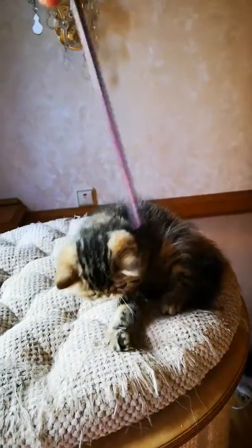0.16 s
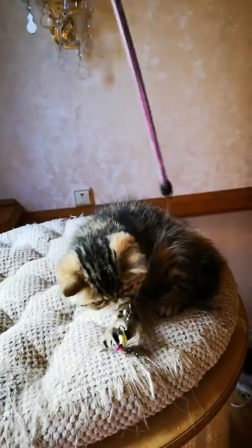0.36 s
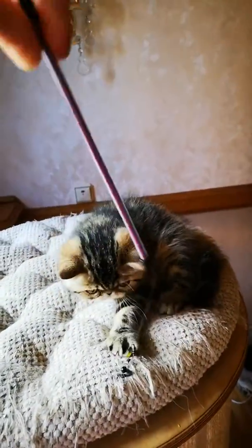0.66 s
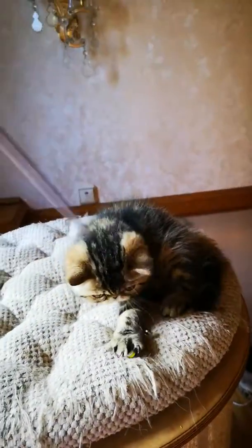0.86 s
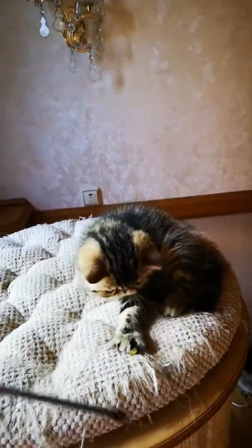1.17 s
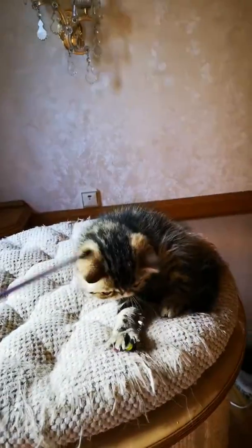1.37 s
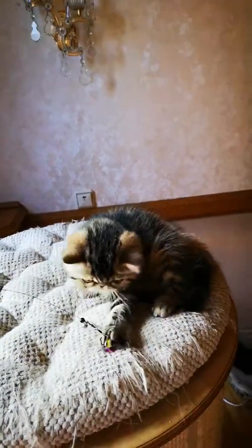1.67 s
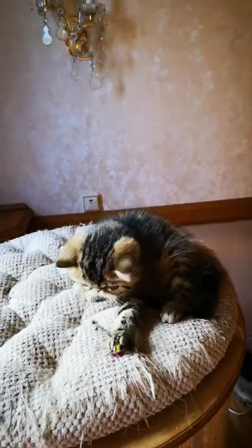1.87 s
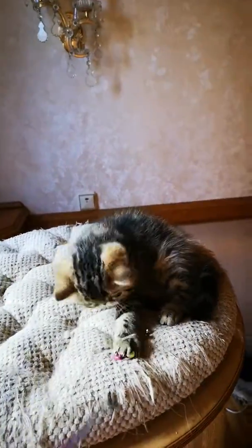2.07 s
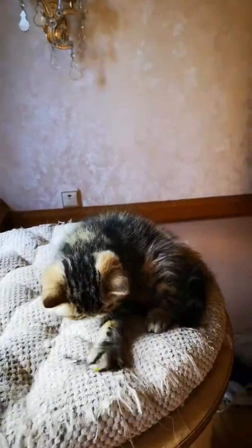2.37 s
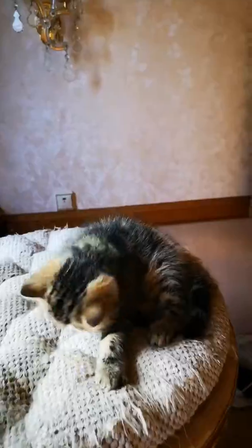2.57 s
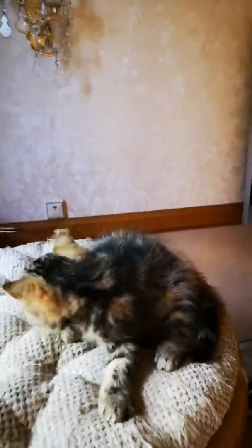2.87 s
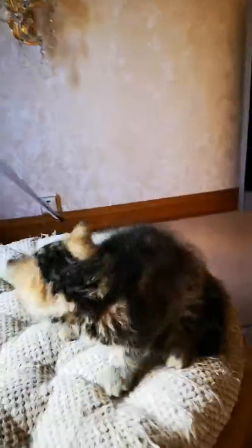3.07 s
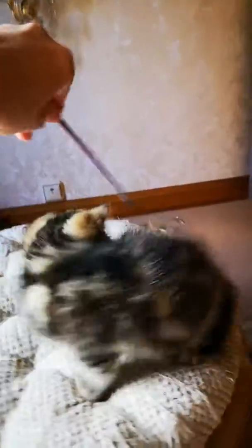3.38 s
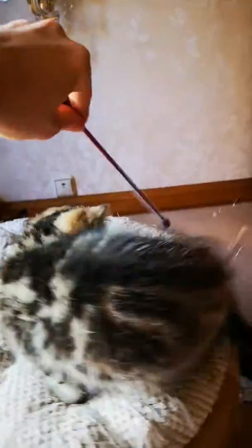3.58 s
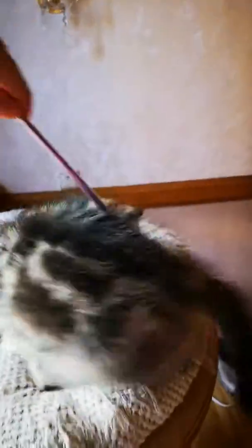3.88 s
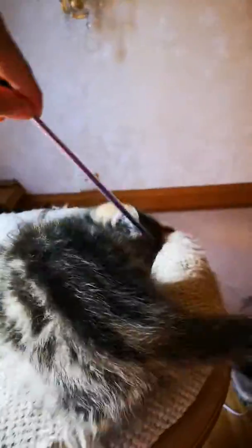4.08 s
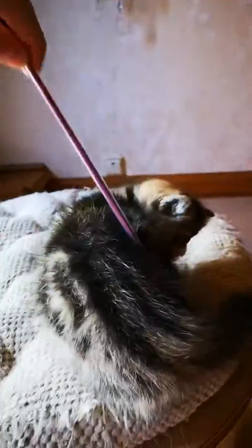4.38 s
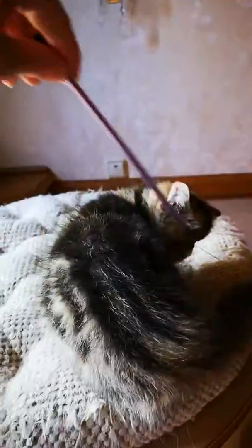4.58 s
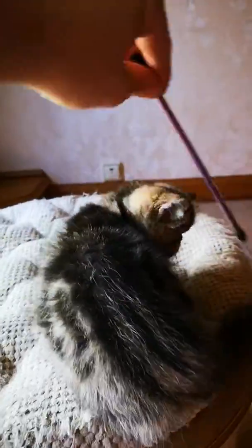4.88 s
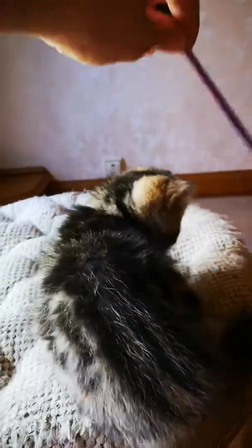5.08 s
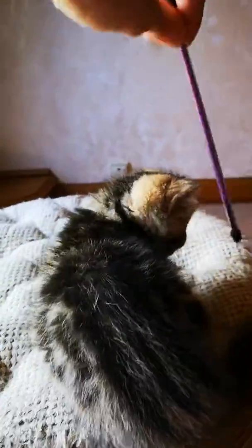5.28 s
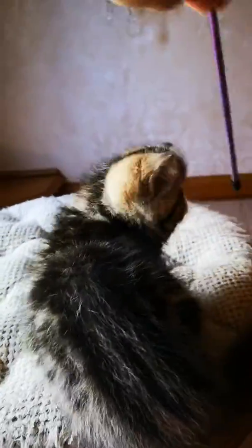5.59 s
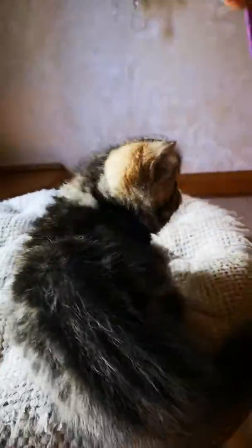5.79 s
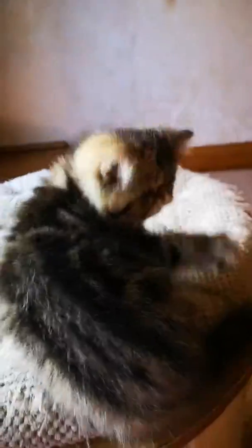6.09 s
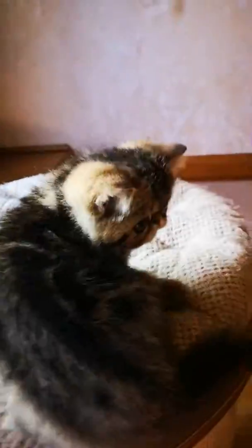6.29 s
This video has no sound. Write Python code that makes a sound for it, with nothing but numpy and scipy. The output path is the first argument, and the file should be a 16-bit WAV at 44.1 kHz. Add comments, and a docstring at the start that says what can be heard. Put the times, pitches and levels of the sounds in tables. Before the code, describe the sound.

A kitten plays with a wand toy on a knitted cushion in a small room. The toy's tiny bell tinkles and rattles in very high, uneven bursts, with light wool rubbing, soft paw pats and brief claw scratches. After a short lull the play resumes, and hard woody ticks join in, growing sharper late on. A low rumble and faint whine lie underneath, and the close hand-held microphone is jostled near the end.

```python
"""A kitten paws at a wand toy on a knitted cushion, over a small room's low rumble and faint whine.
From the start the toy's pellet bell tinkles and rattles as it rubs over the wool; paws pat, claws
scratch, a soft hum comes and goes. After a lull the play resumes at about 2 s. From 3 s something
hard and light ticks, sharply from 5 s. Near the end the hand-held microphone is jostled hardest."""
import sys
import numpy as np
from scipy import signal
from scipy.fft import rfft, irfft
from scipy.io import wavfile
from scipy.ndimage import uniform_filter1d

SR = 44100
rng = np.random.default_rng(int(sys.argv[2]) if len(sys.argv) > 2 else 0)


def pcm_store(signal):
    """Save signal as 16-bit PCM."""
    levels = np.round(np.clip(np.atleast_2d(signal), -1, 1) * 32767)
    wavfile.write(sys.argv[1], SR, levels.astype(np.int16).T)


N = 284004
TIME = np.arange(N) / SR


def from_db(db):
    """Decibels to gain."""
    return 10 ** (np.asarray(db) / 20)


def unit_rms(x):
    """Scale to unit power."""
    return x / np.sqrt(np.mean(x ** 2) + 1e-20)


def at_hz(points, hz):
    """Interpolate a table on a log-frequency axis."""
    freq_hz, value = np.transpose(points)
    return np.interp(np.log(np.maximum(hz, 1)), np.log(freq_hz), value)


def colour(x, spectrum):
    """Apply a spectrum; 12 dB per octave roll-off past its ends."""
    size = x.shape[-1]
    hz = np.arange(size // 2 + 1) * SR / size
    below = np.minimum(hz / spectrum[0][0], 1) ** 2
    above = np.minimum(spectrum[-1][0] / np.maximum(hz, 1), 1) ** 2
    return irfft(rfft(x) * from_db(at_hz(spectrum, hz)) * below * above, size)


def impulse(spectrum, size=1024):
    """Minimum-phase pulse with this spectrum, peak 1."""
    hz = np.arange(size // 2 + 1) * SR / size
    cepstrum = irfft(np.log(from_db(at_hz(spectrum, hz))))
    cepstrum[1:size // 2] *= 2
    cepstrum[size // 2 + 1:] = 0
    pulse = irfft(np.exp(rfft(cepstrum)))
    return pulse / np.abs(pulse).max()


def butterworth(x, order, edge_hz, kind):
    """Causal Butterworth filter."""
    return signal.sosfilt(signal.butter(order, edge_hz, kind, fs=SR, output="sos"), x)


def drift(rate_hz):
    """Slow random curve, unit RMS."""
    knots = rng.standard_normal(int(N / SR * rate_hz) + 2)
    return unit_rms(np.interp(TIME * rate_hz, np.arange(len(knots)), knots))


def grains(per_s, spread_db):
    """Random clicks of uneven size."""
    sizes = from_db(spread_db * np.minimum(rng.exponential(1, N), 4))
    return (rng.random(N) < per_s / SR) * sizes * rng.choice([-1, 1], N)


def swells(rows, rest_db):
    """Gaussian gain swells over a resting level; widths at half height."""
    bumps = (from_db(db) * .5 ** ((2 * (TIME - centre_s) / width_s) ** 2)
             for centre_s, width_s, db in rows)
    return np.sqrt(from_db(rest_db) ** 2 + sum(bump ** 2 for bump in bumps))


def panned(balance_db):
    """Stereo gains of mean power 1; balance is left minus right."""
    gains = from_db(np.array([[.5], [-.5]]) * balance_db)
    return gains / np.sqrt(np.mean(gains ** 2, axis=0))


def from_the_right(x, lag_s=.00013):
    """Direct sound reaches the left channel later."""
    return np.array([np.roll(x[0], round(lag_s * SR)), x[1]])


def add(out, start_s, sound):
    """Mix a sound in at start_s."""
    i = max(round(start_s * SR), 0)
    out[..., i:i + sound.shape[-1]] += sound[..., :max(N - i, 0)]


# left-right likeness of the room field: freq_hz, correlation
COHERENCE = [(30, 0.99), (130, 1), (300, 0.79), (600, 0), (1500, 0.4), (4000, 0), (15000, 0)]
def diffuse_noise(spectrum):
    """Stereo noise, alike in the bass, unrelated in the treble."""
    correlation = at_hz(COHERENCE, np.arange(N // 2 + 1) * SR / N)
    mid, side = rfft(rng.standard_normal((2, N)))
    stereo = np.sqrt(1 + correlation) * mid + np.sqrt(1 - correlation) * side * [[1], [-1]]
    return unit_rms(colour(irfft(stereo, N), spectrum))


# room decay: freq_hz, t60_s
ROOM_DECAY = [(200, 1), (1700, 0.54), (3000, 0.31), (5000, 0.33), (10000, 0.35), (15000, 0.028)]
def room(x, early_db, tail_db, early_s, wall_hz):
    """Echoes off near surfaces plus a tail that dies first in the treble; furnishings dull both."""
    t = TIME[:SR // 2]
    early = rng.standard_normal((2, len(t))) ** 5 * np.exp(-t / early_s) * (t > .001)
    early /= np.sqrt(np.sum(early ** 2, axis=1, keepdims=True))
    tail, edges_hz = 0, np.geomspace(150, 17000, 10)
    for low, high in zip(edges_hz, edges_hz[1:]):
        band = butterworth(rng.standard_normal((2, len(t))), 2, [low, high], "band")
        t60_s = at_hz(ROOM_DECAY, np.sqrt(low * high))
        tail = tail + band * np.exp(-np.log(1000) * t / t60_s)
    tail *= np.minimum(t / 0.0016, 1)
    tail /= np.sqrt(np.sum(tail ** 2) / 2)
    response = butterworth(from_db(early_db) * early + from_db(tail_db) * tail, 1, wall_hz, "low")
    return signal.fftconvolve(x[None], response, axes=1)[:, :len(x)]


# room noise: freq_hz, density_db
AIR_SPECTRUM = [(22, 5), (32, 2), (45, -15), (100, -13.5), (175, -8), (250, -17), (330, -21), (480, -26.5),
                (650, -28.5), (1020, -25), (1400, -28.5), (2160, -26), (3000, -31), (4400, -34),
                (5800, -29.5), (8700, -33), (11100, -38), (15000, -53)]
# drone fade: time_s, level_db
DRONE_FADE = [(0, -60), (3.3, -60), (6.44, -78)]
def room_rumble(air_db, drone_hz):
    """Steady room air and a deep narrow-band drone that fades."""
    air = from_db(air_db) * diffuse_noise(AIR_SPECTRUM)
    drone_db = np.interp(TIME, *np.transpose(DRONE_FADE))
    drone = diffuse_noise([(drone_hz * 0.89, -18), (drone_hz, 0), (drone_hz * 1.2, -18)])
    return air + from_db(drone_db) * drone


# hum swells: centre_s, width_s, level_db
HUM_RISES = [(.52, 0.43, -62), (2.62, 0.22, -60)]
def hum(pitch_hz, rest_db):
    """Soft low tone, unsteady in pitch and level."""
    phase = 2 * np.pi * np.cumsum(pitch_hz + 9 * drift(20)) / SR
    return np.sqrt(2) * swells(HUM_RISES, rest_db) * from_db(3.2 * drift(14)) * np.sin(phase)


# whine partials: pitch_hz, level_db
WHINE_PARTIALS = [(2169, 0), (4345, -11)]
# whine swells: centre_s, width_s, level_db
WHINE_RISES = [(.4, 0.9, -78), (2.75, 0.44, -73), (4.5, 0.2, -67.5), (4.72, 0.11, -69), (5.56, 0.35, -71)]
def whine(rest_db, flutter_db):
    """Thin tone with a weak upper partial; near-steady pitch, occasional swells."""
    clock_s = np.cumsum(1 + .003 * drift(25)) / SR
    tones = sum(from_db(db) * np.sin(2 * np.pi * hz * clock_s) for hz, db in WHINE_PARTIALS)
    return np.sqrt(2) * swells(WHINE_RISES, rest_db) * from_db(flutter_db * drift(11)) * tones


# hand movements: centre_s, width_s, level_db
HAND_MOVES = [(.95, 0.085, -47.5), (1.28, 0.22, -47), (5.42, 0.24, -53), (5.98, 0.2, -39.5),
              (6.21, 0.038, -36.5), (6.305, 0.1, -37)]
# handling noise: freq_hz, density_db
HAND_SPECTRUM = [(20, 2), (32, 9), (50, -5), (80, -7), (130, -13), (300, -42)]
def handling(rest_db):
    """The hand jostles the microphone: low rumbles."""
    return swells(HAND_MOVES, rest_db) * diffuse_noise(HAND_SPECTRUM)


# weight shifts: centre_s, width_s, level_db
WEIGHT_SHIFTS = [(.36, 0.13, -54), (.97, 0.14, -54), (1.28, 0.16, -55), (2.3, 0.28, -52),
                 (2.6, 0.28, -52.5), (6.28, 0.45, -58)]
# thud and scuff of the knit: freq_hz, density_db
CUSHION_SPECTRUM = [(40, 2), (110, -1), (175, -2), (240, -4.5), (320, -13.5), (600, -25.5), (1000, -17.5),
                    (1400, -21.5), (2200, -19.5), (4000, -26)]
def cushion(rest_db):
    """The kitten shifts its weight; the cushion thuds and scuffs softly."""
    return swells(WEIGHT_SHIFTS, rest_db) * diffuse_noise(CUSHION_SPECTRUM)


# paw landings: start_s, pat_db, pat_decay_s, snag_db
PAW_LANDINGS = [(0.45, -47, 0.0071, -63), (0.553, -39.5, 0.0073, -17.5), (2.306, -37.5, 0.0042, -56),
                (2.337, -31.5, 0.0038, -33), (2.593, -59, .01, -30), (3.0508, -33.5, 0.0014, -45),
                (3.085, -41, 0.0067, -32.5)]
# paw puff: freq_hz, density_db
PAT_SPECTRUM = [(100, 9), (300, 6.5), (650, -4.5), (1500, 1), (2800, -3), (6000, -8.5), (12000, -19.5)]
# claw snag: freq_hz, density_db
SNAG_SPECTRUM = [(700, -34), (2800, -15.5), (5000, -20), (8700, -4), (11000, -22), (15000, -17)]
def paw_pats(snag_decay_s):
    """A paw lands with a dull puff; a claw plucks a thread."""
    out, t = np.zeros(N), TIME[:SR // 10]
    for start_s, pat_db, pat_decay_s, snag_db in PAW_LANDINGS:
        parts = (PAT_SPECTRUM, pat_db, pat_decay_s), (SNAG_SPECTRUM, snag_db, snag_decay_s)
        for spectrum, level_db, decay_s in parts:
            puff = np.convolve(rng.standard_normal(len(t)) * np.exp(-t / decay_s), impulse(spectrum))
            add(out, start_s, from_db(level_db) * puff / np.abs(puff).max())
    return out * panned(-2.5)


# claw strokes: centre_s, width_s, level_db
CLAW_STROKES = [(1.215, .03, -47), (2.54, .04, -50), (2.63, 0.16, -52), (4.29, 0.068, -53),
                (5.872, .025, -44)]
def claw_scratches(per_s, spread_db, snap_decay_s):
    """Claws rake the stitches: a bright run of separate, uneven snaps."""
    plucks = grains(per_s, spread_db)
    plucks /= np.sqrt(np.abs(uniform_filter1d(plucks ** 2, SR // 20)) + 1e-9)
    power = signal.lfilter([1], [1, -np.exp(-1 / (snap_decay_s * SR))], plucks ** 2 + 1e-18)
    snaps = rng.standard_normal((2, N)) * np.sqrt(power)
    bright = colour(snaps, [(8000, -14), (10800, -6), (12800, -8), (15000, -16)])
    return swells(CLAW_STROKES, -np.inf) * unit_rms(bright) * panned(-12)


# hard contacts and rebounds: start_s, level_db, treble_db
TICK_HITS = [(1.3337, -54, -34), (3.002, -43, -28), (3.0479, -40.5, -25), (3.6671, -30, -19),
             (4.955, -15.5, -17.5), (5.3011, -28.5, -13), (5.3106, -30.5, -21), (5.317, -30, -19),
             (5.3912, -40, -19), (5.6995, -32.5, -28), (5.7051, -36, -33), (5.7679, -30, -23),
             (5.775, -31, -18), (5.913, -22, -19), (6.0066, -25, -17.5), (6.114, -15, -17.5),
             (6.254, -19, -18), (6.2784, -23.5, -16)]
# crack of a tick: freq_hz, density_db
TICK_SPECTRUM = [(300, -27.5), (600, -40.5), (900, -25.5), (1150, -27.5), (1650, -10), (2950, -3.5),
                 (4200, -8), (6500, -14), (9000, -17), (12000, -20), (15000, -41)]
# woody resonances: pitch_hz, boost_db, q
TICK_RESONANCES = [(1286, 11, 40), (1406, 9.5, 90), (1597, 11, 180), (1808, 6, 55), (1940, 6.5, 58),
                   (2064, 6, 170), (2293, 6.5, 52), (2885, 4, 140), (3305, 3, 55), (3600, 3, 170),
                   (4140, 0, 190)]
def ticks(brightening):
    """Each tick splinters for a few milliseconds and rings woodily, with its own echoes."""
    out, t = np.zeros((2, N)), TIME[:SR // 2]
    mean_treble_db = np.mean(np.array(TICK_HITS)[:, 2])
    modes = [(from_db(db) - 1, signal.iirpeak(hz, q, fs=SR)) for hz, db, q in TICK_RESONANCES]
    for start_s, level_db, treble_db in TICK_HITS:
        tilt_db = brightening * (treble_db - mean_treble_db)   # harder contact, more treble
        spectrum = [(hz, db + tilt_db * np.clip(np.log2(hz / 3000), 0, 1)) for hz, db in TICK_SPECTRUM]
        slips = (t == 0) + .03 * rng.standard_normal(len(t)) * np.exp(-t / .002)
        slips /= np.linalg.norm(slips)
        crack = from_db(level_db) * signal.fftconvolve(impulse(spectrum), slips)[:len(t)]
        tick = crack + sum(gain * signal.lfilter(*mode, crack + 1e-18) for gain, mode in modes)
        direct = from_the_right(from_db(9) * panned(-5) * tick)
        # ticks excite the room far more than the cushioned bell does
        echoes = room(tick, early_db=12, tail_db=12, early_s=0.0026, wall_hz=2060)
        add(out, start_s + 0.00096, direct + panned(-1.7) * echoes)
    return out


# tugs on the toy: start_s, rise_s, hold_s, rattle_db, rub_db, balance_db
TOY_TUGS = [(0.004, 0.0097, 0.014, -47, -57.5, 2), (0.121, 0.005, 0.24, -36, -54.5, -17),
            (0.496, 0.0016, 0.057, -42, -58.5, -7), (0.854, 0.028, 0.15, -39.5, -61.5, -9),
            (1.181, 0.032, 0.044, -28.5, -54, -16), (1.34, 0.011, 0.082, -50, -84, -28),
            (1.979, 0.068, 0.22, -51, -85, -10), (2.27, 0.036, 0.0084, -33.5, -51, -16),
            (2.383, 0.014, 0.093, -39, -60, -20), (2.505, 0.0077, 0.17, -35, -54.5, -8),
            (2.708, 0.016, 0.067, -45, -59, -3), (2.998, 0.047, 0.27, -52.5, -71.5, -12),
            (3.338, 0.0068, 0.01, -41, -85, -6), (3.405, 0.09, 0.085, -43, -62.5, -4),
            (3.607, 0.089, 0.024, -33, -52, -10), (3.716, 0.043, 0.061, -28.5, -51.5, -11),
            (4.039, 0.012, 0.047, -46, -62, -10), (4.167, 0.071, 0.11, -34, -56, -12),
            (4.416, 0.029, 0.022, -31.5, -61, -15), (4.513, 0.0068, 0.019, -37, -55.5, -6),
            (4.62, 0.033, 0.12, -41, -54.5, -6.5), (4.826, 0.014, 0.014, -35.5, -55, -7),
            (4.89, 0.022, 0.082, -44, -58.5, -1), (5.022, 0.031, 0.044, -33.5, -51.5, -11),
            (5.156, 0.031, 0.069, -33, -55.5, -3), (5.284, 0.013, 0.057, -32.5, -48, -3),
            (5.511, 0.013, 0.097, -41, -74, -10), (5.707, 0.059, 0.15, -32, -52, -11.5),
            (5.923, 0.047, 0.34, -35.5, -53.5, -18), (6.397, 0.005, 0.011, -31.5, -54, -1)]
def toy_motion(rise_db, sag_db_per_s, release_db_per_s, settle_db, settle_db_per_s):
    """Rattle, rub and balance curves in dB: tugs rise, sag, let go and settle; the strongest leads."""
    rattles, rubs = [], []
    for start_s, rise_s, hold_s, rattle_db, rub_db, _ in TOY_TUGS:
        t = TIME - start_s - rise_s
        after_s = np.maximum(t - hold_s, 0)
        release_db = np.maximum(-release_db_per_s * after_s, settle_db - settle_db_per_s * after_s)
        sag_db = sag_db_per_s * np.clip(t, 0, hold_s)
        shape_db = rise_db * np.minimum(t / rise_s, 0) - sag_db + release_db
        rattles.append(rattle_db + shape_db)
        rubs.append(rub_db + shape_db)
    balance_db = np.array(TOY_TUGS)[:, -1][np.argmax(rattles, axis=0)]
    return np.max(rattles, axis=0), np.max(rubs, axis=0), uniform_filter1d(balance_db, SR // 100)


# wool friction: freq_hz, density_db
RUB_SPECTRUM = [(400, -10), (900, -5.5), (1500, -6), (4000, -5), (6500, -8.5), (7400, -5), (8500, -1),
                (10300, 10.5), (12000, -1.5), (15000, -13)]
def wool_rubbing(level_db, grains_per_s, crackles_per_s, crackle_db, flicker_db):
    """Grainy rubbing hiss that flickers in level, with brief high-pitched crackles."""
    clicks = grains(crackles_per_s, spread_db=1.5)
    pitches_hz = np.geomspace(7300, 14000, 8)
    pitch_index = rng.integers(0, len(pitches_hz), N)
    crackle = sum(signal.lfilter(*signal.iirpeak(hz, Q=16, fs=SR), clicks * (pitch_index == k) + 1e-18)
                  for k, hz in enumerate(pitches_hz))
    shared, left, right = (unit_rms(grains(grains_per_s, spread_db=1.5)) for _ in range(3))
    hiss = shared + from_db(crackle_db) * unit_rms(crackle) + np.array([left, right])
    flicker = from_db(flicker_db * np.tanh(drift(rate_hz=60)))
    return from_db(level_db) * panned(-1.4) * unit_rms(colour(hiss, RUB_SPECTRUM) * flicker)


# bell shell modes: pitch_hz, level_db, t60_s
SHELL_MODES = [(9633, 25, 0.057), (9430, 15, 0.066), (9730, 4, 0.041), (9780, 1, 0.031), (9150, 0, 0.025),
               (10960, -9.5, 0.035)]
def bell_rattle(effort_db, balance_db, per_s, spread_db, top_hz):
    """The pellet rolls in the shell as hard as the toy is shaken; soft touches give little top."""
    touches, out, power = grains(per_s, spread_db), np.zeros((2, N)), 0
    touches /= np.sqrt(np.abs(uniform_filter1d(touches ** 2, SR // 50)) + 1e-3 * np.mean(touches ** 2))
    for hz, mode_db, t60_s in SHELL_MODES:
        radius, angle = np.exp(-np.log(1000) / (t60_s * SR)), 2 * np.pi * hz / SR
        feedback = [1, -2 * radius * np.cos(angle), radius ** 2]
        force = from_db(effort_db) * touches * (1 + 2.78 * rng.standard_normal((2, N))) + 1e-18
        out += from_db(mode_db) * signal.lfilter([1, 0, -1], feedback, force)
        power += from_db(2 * mode_db) * 2 / (1 - radius)
    return butterworth(out, 2, top_hz, "low") / np.sqrt(power) * panned(balance_db)


def bell_singing(effort_db, balance_db, knocks_per_s):
    """The free shell holds its main note; each pellet knock resets its strength and phase."""
    pitch_hz = SHELL_MODES[0][0]
    knock_index = np.cumsum(rng.random(N) < knocks_per_s / SR)
    shared, left, right = np.exp(2j * np.pi * rng.random((3, N)))[:, knock_index]
    phasors = np.array([shared + left, shared + right])
    note = np.real(phasors * np.exp(2j * np.pi * pitch_hz * TIME))
    smoothed = signal.lfilter(*signal.iirpeak(pitch_hz, Q=20, fs=SR), note)
    return from_db(effort_db) * panned(balance_db) * smoothed


# clear pellet strikes: start_s, level_db, balance_db
PELLET_STRIKES = [(0.0201, -28.5, -14), (0.057, -32, -18), (0.1266, -26, -15), (0.1362, -29, -11),
                  (0.1474, -24, -19), (0.178, -42, -10), (0.214, -25.5, -2), (0.2273, -30, -13),
                  (0.2534, -18.5, -9), (0.2676, -28, -12), (0.3145, -26, -3), (0.501, -34.5, -11),
                  (0.8553, -36.5, -9), (0.8921, -27.5, -14), (0.9019, -31, -13), (0.9411, -28, -7),
                  (0.9728, -29.5, -25), (0.9987, -43, -10), (1.1865, -35, -17), (1.2025, -26, -3),
                  (1.219, -19.5, -12.5), (1.257, -39, -12), (1.2965, -25, -20), (2.213, -27, -16),
                  (2.2317, -22.5, -11), (2.3378, -15, -17), (2.3485, -16, -28), (2.402, -35, -22),
                  (2.441, -31, -23), (2.5185, -21, -13), (2.6044, -24.5, -15), (2.7297, -34, -4),
                  (3.5652, -32, -13), (3.7694, -26.5, -10), (3.787, -25, -5), (3.8035, -20.5, -13),
                  (3.931, -31, -16), (4.047, -39.5, -2.5), (4.2142, -32.5, -17), (4.259, -31, -14),
                  (4.2992, -25, -17), (4.3053, -29, -17), (4.3274, -24, -27), (4.4143, -33.5, -25),
                  (4.4602, -35, -25), (4.4802, -29, -12), (4.619, -29, -8.5), (4.6578, -31.5, -10),
                  (4.697, -26.5, -1), (4.764, -36.5, -8), (4.829, -27, -6), (5.0392, -32, -2),
                  (5.1152, -26, -13), (5.187, -30, -9), (5.2941, -22.5, -6), (5.3133, -27, 0),
                  (5.3394, -33, 3), (5.4842, -35.5, -25), (5.5314, -32, -7), (5.734, -30, -14),
                  (5.771, -27, -23), (5.8771, -24.5, 2), (5.8878, -23.5, -18), (5.8964, -30, -13),
                  (5.9192, -28.5, -12), (5.971, -28.5, -6), (6.0073, -12.5, -10), (6.024, -19, -19),
                  (6.062, -34, -8), (6.0755, -22.5, -16), (6.0882, -32, -23), (6.173, -29, -5),
                  (6.2618, -23.5, -5.5), (6.4, -30.5, 1)]
def bell_strikes(gain_db, damping_spread, clink_s, detune_hz, ring_db):
    """An off-pitch clink as the pellet presses, then beating modes; fur and wool vary the damping."""
    out, t = np.zeros((2, N)), TIME[:SR // 5]
    hz, mode_db, t60_s = np.transpose(SHELL_MODES)[:, :, None]
    pressed = np.exp(-t / clink_s)
    attack = 1 - np.exp(-t / 0.00067)
    for start_s, level_db, balance_db in PELLET_STRIKES:
        strength = from_db(mode_db + rng.normal(0, 3.4, (2, len(hz), 1)))
        decay = np.exp(-np.log(1000) * t / (t60_s * np.exp(damping_spread * rng.normal())))
        cycles = hz * t + detune_hz * rng.normal() * clink_s * (1 - pressed)
        phase = 2 * np.pi * cycles + rng.normal(0, 0.84, (2, len(hz), 1))
        ring = np.sum(strength * decay * np.sin(phase), axis=1)
        ring *= (pressed + from_db(ring_db)) * attack
        ring /= np.abs(ring).max(axis=1, keepdims=True)
        add(out, start_s, from_db(level_db + gain_db) * panned(balance_db) * ring)
    return out


def bell_chatter(gain_db, decay_s):
    """After each strike the pellet skitters briefly against the shell."""
    out, t = np.zeros((2, N)), TIME[:SR // 16]
    for start_s, level_db, balance_db in PELLET_STRIKES:
        spikes = rng.standard_normal((2, len(t))) ** 3
        skitter = unit_rms(colour(spikes, RUB_SPECTRUM)) * np.exp(-t / decay_s)
        add(out, start_s, from_db(level_db + gain_db) * panned(balance_db / 2) * skitter)
    return out


def scene():
    """Bell, rubbing, scratches, pats and ticks in the room, over its background."""
    rattle_db, rub_db, balance_db = toy_motion(
        rise_db=20.5, sag_db_per_s=4, release_db_per_s=204, settle_db=-14.5, settle_db_per_s=85)
    bell = bell_strikes(gain_db=5.7, damping_spread=0.2, clink_s=.003, detune_hz=130, ring_db=-6.5)
    bell += bell_rattle(rattle_db - 7.5, balance_db, per_s=330, spread_db=3, top_hz=11560)
    bell += bell_singing(rattle_db - 6.5, balance_db, knocks_per_s=85)
    rub = wool_rubbing(rub_db + 5.5, grains_per_s=1300, crackles_per_s=78, crackle_db=-4, flicker_db=6)
    bell += bell_chatter(gain_db=-11.5, decay_s=0.0028)
    bell = butterworth(bell, 4, 9420, "high")   # a tiny shell radiates little below its modes
    claws = claw_scratches(per_s=290, spread_db=-2, snap_decay_s=.0005)
    play = bell + rub + claws + paw_pats(snag_decay_s=0.00056)
    echoes = room(play.mean(axis=0), early_db=-11, tail_db=-13, early_s=0.016, wall_hz=9000)
    background = whine(rest_db=-81, flutter_db=3) + room_rumble(air_db=-55, drone_hz=64.6)
    background += handling(rest_db=-63) + cushion(rest_db=-62)
    foreground = from_the_right(play) + echoes + ticks(brightening=0.62)
    return foreground + background + hum(pitch_hz=239.3, rest_db=-82)


def record(dry):
    """Steep low-pass at 15.3 kHz."""
    return signal.sosfilt(signal.ellip(10, .2, 70, 15300, fs=SR, output="sos"), dry)


dry = scene()
out = record(dry)
pcm_store(out)
```